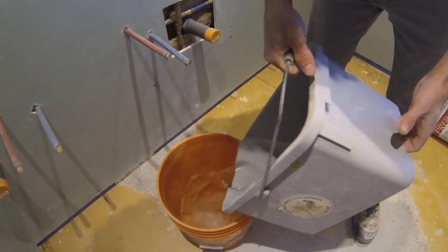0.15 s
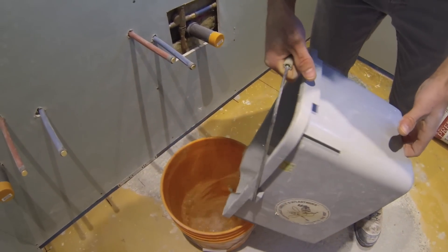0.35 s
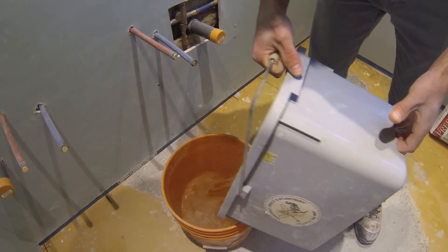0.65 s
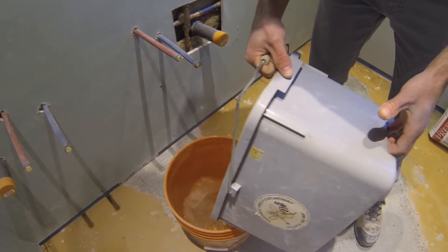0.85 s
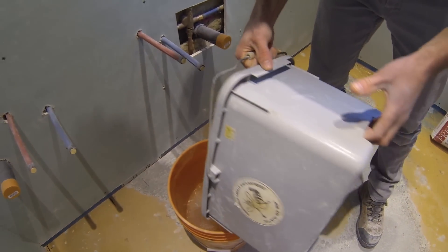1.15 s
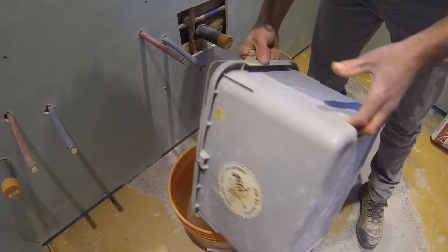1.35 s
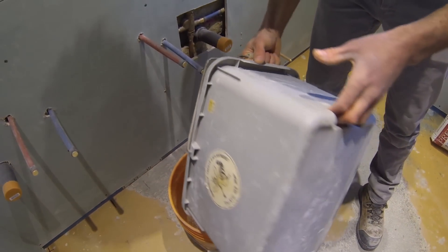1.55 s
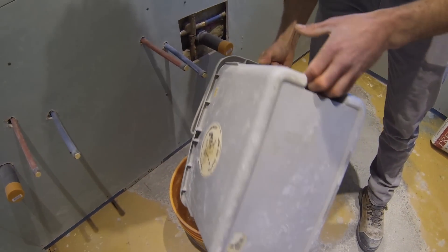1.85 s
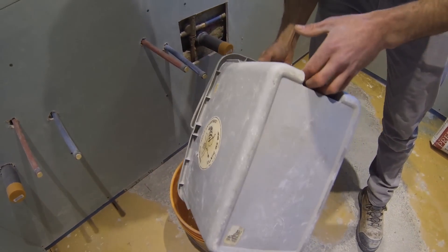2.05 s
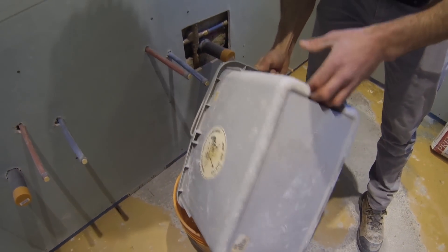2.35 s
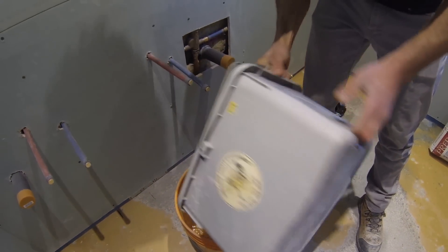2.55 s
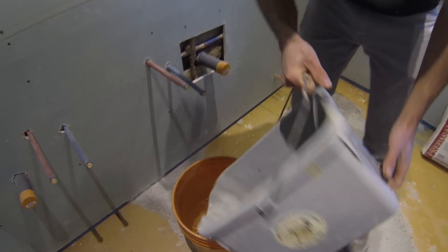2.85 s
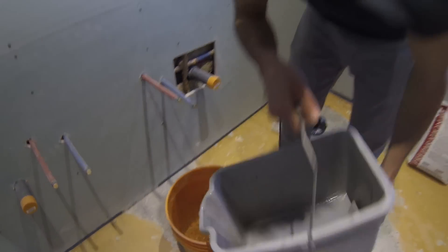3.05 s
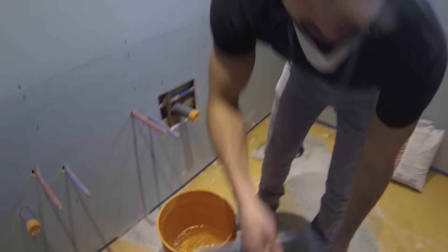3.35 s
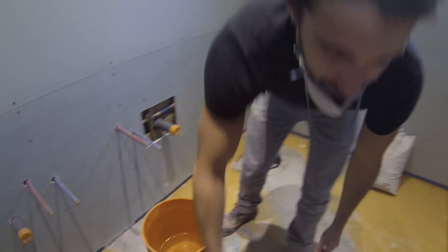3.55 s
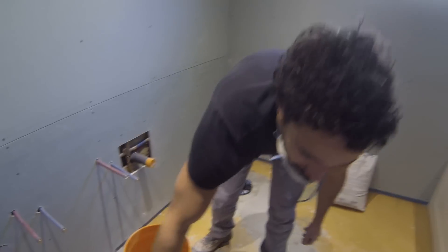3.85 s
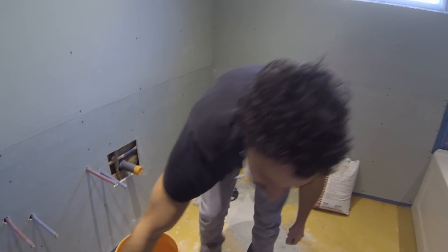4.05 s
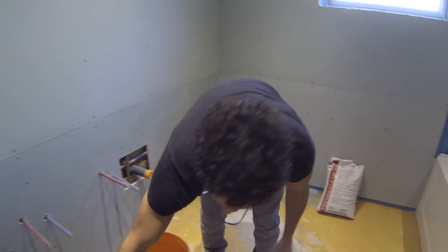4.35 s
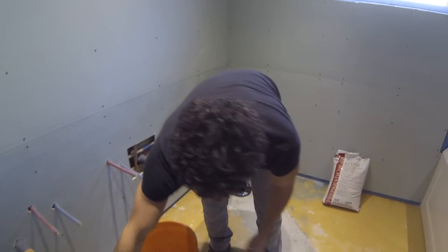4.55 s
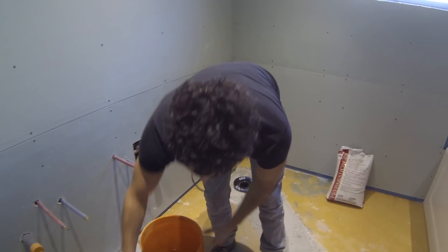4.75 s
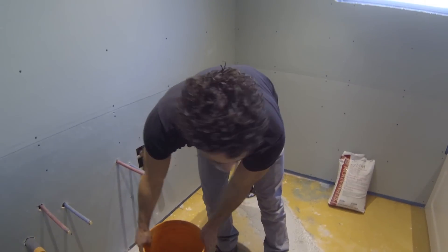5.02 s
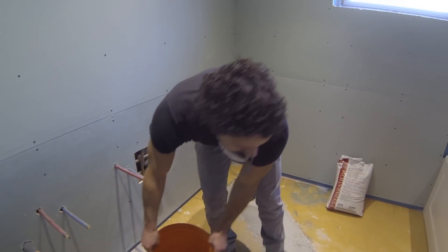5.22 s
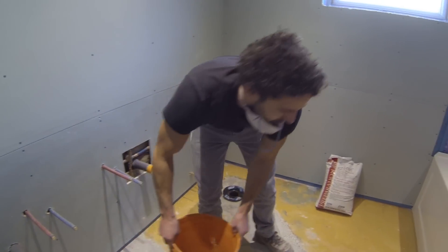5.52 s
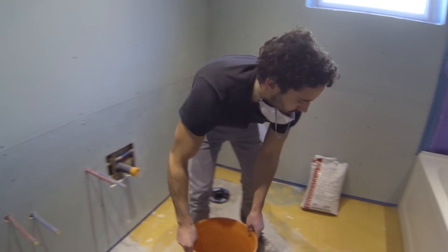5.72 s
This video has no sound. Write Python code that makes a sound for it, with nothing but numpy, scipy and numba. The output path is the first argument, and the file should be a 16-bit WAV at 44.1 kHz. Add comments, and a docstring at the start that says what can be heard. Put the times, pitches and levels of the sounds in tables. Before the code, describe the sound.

A splashing, gurgling pour dwindles to plops and a faint dribble, followed by sharp plastic thumps, a handle clack and gritty scrapes.

```python
"""Water poured between two buckets

Water is tipped from one plastic bucket into another in a small bare room; the stream thins to drips.
The empty bucket lands and rocks, its wire handle hits the rim, and the full one is gripped and dragged.
Water is swarms of ringing bubbles; knocks are noise bursts coloured by the walls plus damped modes.
Close hand-held microphones rumble with movement and clip on the loudest knocks."""
import sys
import numpy as np
from scipy import signal
from scipy.fft import rfft, irfft, next_fast_len
from scipy.io import wavfile
from numba import njit

SR = 44100
rng = np.random.default_rng(int(sys.argv[2]) if len(sys.argv) > 2 else 0)


def persist_wave(psi):
    """Save psi, clipped to +-1, as 16-bit WAV."""
    counts = np.round(np.clip(psi, -1, 1) * 32767).astype(np.int16)
    wavfile.write(sys.argv[1], SR, np.atleast_2d(counts).T)


N = 259347
TIME = np.arange(N) / SR  # seconds
TOP_HZ = 15500  # upper limit of the sound

# Balance of a full stream: its splash level, and the other parts relative to the splash
FULL_STREAM_DB, FULL_GURGLE_DB, FULL_PLUNGE_DB, FULL_SPRAY_DB = -22, -2.5, -19, -11
# A thinner stream gurgles less and its single drops thump and spray more: dB per dB of thinning
GURGLE_LOSS, PLUNGE_GAIN, SPRAY_GAIN = 0.076, 0.15, 0.079
# The last dribble off the rim fades steadily until the bucket is swung away; level as the stream ends
DRIBBLE_DB, DRIBBLE_FADE_DB_PER_S, DRIBBLE_END_S, CUT_OFF_DB_PER_S = -43.5, 7, 3.17, 400
# Strength of the stream, waning until it breaks off: start_s, splash_level_db
STREAM_STRENGTH = [(0.0, -19.5), (1.0, -22.5), (1.651, -26), (1.921, -28.5), (2.08, -45)]
# Slugs of water that plunge deep and change the spray:
# centre_s, spread_s (to 1/e), extra_plunge_db, extra_spray_db
GUSHES = [(0.61, 0.047, 6, 4), (0.743, 0.071, 9.5, -0.5), (1.183, 0.12, 14.5, -7), (1.563, 0.057, 9.5, -1),
          (1.89, 0.043, 19, -8)]


def pour():
    """Jet break-up: the stream's strength sets the balance of its parts, and gushes deepen it."""
    s, db = np.transpose(STREAM_STRENGTH)
    after_s = TIME - s[-1]
    stream_db = np.interp(TIME, s, db) - CUT_OFF_DB_PER_S * np.maximum(after_s, 0)
    dribble_db = DRIBBLE_DB - DRIBBLE_FADE_DB_PER_S * after_s
    dribble_db = dribble_db - CUT_OFF_DB_PER_S * np.maximum(TIME - DRIBBLE_END_S, 0)
    splash_db = np.maximum(stream_db, dribble_db)
    thinning_db = np.clip(FULL_STREAM_DB - splash_db, 0, 30)
    gurgle_db = FULL_GURGLE_DB - GURGLE_LOSS * thinning_db
    plunge_db = FULL_PLUNGE_DB + PLUNGE_GAIN * thinning_db
    spray_db = FULL_SPRAY_DB + SPRAY_GAIN * thinning_db
    for centre_s, spread_s, extra_plunge_db, extra_spray_db in GUSHES:
        swell = np.exp(-((TIME - centre_s) / spread_s) ** 2)
        plunge_db = plunge_db + extra_plunge_db * swell
        spray_db = spray_db + extra_spray_db * swell
    return water(splash_db, FULL_STREAM_DB, gurgle_db, plunge_db, spray_db)


def water(splash_db, full_db, gurgle_db, plunge_db, spray_db):
    """Air entrainment: moving water splashes, traps gurgling bubbles, thumps the pool and throws spray."""
    flow = np.clip(undb(0.6 * (splash_db - full_db)), 0.04, 1)
    plunge = swarm(np.sqrt(flow), 80, 500, cycles=8, scatter_db=1.5, rise=0.08, count=6000)
    gurgle = swarm(flow, 470, 1550, cycles=15, scatter_db=3.2, rise=0.08, count=12000)
    splash = swarm(flow, 1496, 5060, cycles=19, scatter_db=3.2, rise=0.04, count=28000)
    crackle = swarm(flow, 1660, 9600, cycles=2.4, scatter_db=2, rise=0, count=24000)
    spray = swarm(flow, 5135, 13590, cycles=58, scatter_db=-0.5, rise=0.014, count=24000)
    mix = undb(-4.5) * (splash + crackle) + undb(gurgle_db) * gurgle
    mix = mix + undb(plunge_db) * plunge + undb(spray_db) * spray
    return undb(splash_db) * mix


# Colour of water landing in the bucket: frequency_hz, gain_db
WATER_COLOUR = [(50, -11), (88, -19.5), (150, -25.5), (245, -4), (330, -9.5), (440, -13), (600, -8),
                (720, -0.5), (1000, 1.5), (1700, -1), (3400, 5), (5400, -0.5), (8000, -8), (15000, -8)]


def swarm(flow, lo_hz, hi_hz, cycles, scatter_db, rise, count):
    """Clustered random process: clumps of like-pitched bubbles at rms 1; thin flow (0-1) is sparse."""
    clumps = np.repeat(rng.random((count // 8, 3)), 8, axis=0)
    when, pitch, chance = clumps.T
    lag, detune, life, size = rng.random((len(clumps), 4)).T
    start = (when * N + 0.012 * SR * lag).astype(np.int64) % N
    hz = lo_hz * (hi_hz / lo_hz) ** pitch
    hz = np.minimum(hz * 2 ** (0.43 * (detune - 0.5)), TOP_HZ)
    size = undb(-scatter_db * np.log(1 - 0.99 * size))
    # A sparse flow keeps fewer clumps but makes each louder
    size = size * (chance < flow[start]) / np.sqrt(flow[start])
    sound = bubbles(start, hz, cycles * (0.5 + life), size, float(rise))
    return unit(colour(sound, WATER_COLOUR))


@njit
def bubbles(start, hz, cycles, size, rise):
    """Bubble resonance: each rings as a decaying sine, its pitch rising as it nears the surface."""
    out = np.zeros(N)
    for k in range(len(start)):
        n, phase = int(cycles[k] * SR / hz[k]) + 2, 0.
        for i in range(min(n, N - start[k])):
            phase += 2 * np.pi * hz[k] * (1 + rise * i / n) / SR
            out[start[k] + i] += size[k] * np.exp(-6 * i / n) * np.sin(phase)
    return out


# Each drop's small bubbles: window of start times, pitch range, mean length in cycles, level over the drop
SPATTER_S, SPATTER_OCTAVES, SPATTER_CYCLES, SPATTER_DB = 0.037, 0.74, 55, 1.5
# Single bubbles, from a deep boom to a high plink: start_s, starting_pitch_hz, level_db, length_s
PLOPS = [(1.141, 92.4, -24.5, 0.23), (1.55, 4530, -29, 0.075), (1.976, 1525, -23, 0.11),
         (1.99, 765, -22, 0.066), (2.257, 861, -44, 0.054), (2.291, 1050, -30, 0.21),
         (2.371, 3400, -39, 0.086), (2.515, 1114, -24, 0.059), (5.08, 759, -21.5, 0.17),
         (5.325, 652, -30, 0.22)]
# Slaps and drops hitting the pool: start_s, level_db, centre_hz, decay_s
SPLATS = [(.908, -20.5, 1830, 0.018), (1.532, -25.5, 4600, 0.022), (1.644, -29, 3100, 0.049),
          (1.669, -18, 5100, 0.0028), (1.877, -25.5, 1870, 0.02), (1.976, -24.5, 2200, 0.0067),
          (2.255, -32, 760, 0.0045), (2.274, -43.5, 8900, 0.014), (2.37, -34, 2740, 0.0041),
          (2.465, -39, 5100, 0.0095), (2.616, -42, 4070, 0.021), (2.776, -43.5, 4770, 0.0071),
          (3.153, -44, 3100, 0.0035)]


def drips():
    """Impact and entrainment: single bubbles ring, and drops slap the pool and leave small bubbles."""
    s, hz, db, length_s = np.transpose(PLOPS)
    out = bubbles((s * SR).astype(np.int64), hz, hz * length_s, undb(db), 0.04)
    for s, db, hz, decay_s in SPLATS:
        hump = [(hz / 8, -28), (hz / 2, -9), (hz, 0), (hz * 2, -15), (hz * 8, -36)]
        add(out, s, undb(db) * contact(decay_s, hump))
        lag, pitch, life, size = rng.random(size=(4, 5))
        start = ((s + SPATTER_S * lag) * SR).astype(np.int64)
        spatter_hz = hz * 2 ** (SPATTER_OCTAVES * (pitch - 0.5))
        cycles = SPATTER_CYCLES * (0.5 + life)
        out += bubbles(start, spatter_hz, cycles, undb(db + SPATTER_DB) * size, 0.065)
    return out


SLOSH_RISE_DB_PER_S, SLOSH_FADE_DB_PER_S = 134, 60.5
FULL_SLOSH_DB = -40  # level at which swaying water breaks into a continuous wash
# Shoves that set the water swaying in the full bucket: crest_s, level_db
SHOVES = [(4.73, -39), (4.898, -39.5), (5.09, -52.5), (5.419, -60.5)]


def slosh():
    """Sloshing: each shove heaps the water up and lets it settle, with much gurgle and little spray."""
    waves = []
    for crest_s, db in SHOVES:
        rise_db = SLOSH_RISE_DB_PER_S * (crest_s - TIME)
        fade_db = SLOSH_FADE_DB_PER_S * (TIME - crest_s)
        waves.append(db - np.maximum(rise_db, fade_db))
    return water(np.max(waves, axis=0), FULL_SLOSH_DB, gurgle_db=12, plunge_db=10, spray_db=-22.5)


# The empty bucket lands and rocks on the floor:
# start_s, level_db, decay_s, brightness_db_per_octave, ring_db (relative to the clatter)
LANDINGS = [(4.2595, -0.5, 0.006, -1.5, -6.5), (4.275, -10, 0.021, -1.5, 5), (4.3515, 4, 0.0044, -2, -22.5),
            (4.383, -19, 0.088, -5, 9), (4.428, -28, 0.02, -7.5, 23.5), (4.638, -1.5, 0.005, 0, -19.5),
            (4.701, -28, 0.0087, 0.5, 11)]
# The emptied bucket bumps in the hand: start_s, level_db, decay_s, brightness_db_per_octave
BUMPS = [(2.785, -44.5, 0.0075, -11.5), (2.846, -36.5, 0.01, -4.5), (2.953, -36.5, 0.0069, 5),
         (3.0745, -37.5, 0.005, -4.5), (3.251, -33.5, 0.0066, -14), (3.309, -24, 0.0028, -5.5)]
# The full bucket is touched, gripped and dragged: start_s, level_db, decay_s, brightness_db_per_octave
GRIPS = [(4.05, -35.5, 0.015, 2.5), (4.074, -24, 0.011, -2.5), (4.828, -12.5, 0.0079, 1.5),
         (4.841, -8, 0.0087, -2.5), (4.965, -26, .02, -10), (5.014, -18, 0.0077, -4),
         (5.058, -17, 0.0062, -0.5), (5.301, -26.5, 0.021, -3.5), (5.356, -19, 0.0088, 3.5),
         (5.370, -15, 0.012, 3)]
# Low modes of the empty bucket on the floor: frequency_hz, level_db, t60_s
STANDING_MODES = [(110, -28, .4), (165, -19, .45), (237, -14, .4), (278, 0, .39), (329, -12, .3),
                  (452, -4, .28), (495, -13, .28), (775, -16, .35), (872, -11, .35), (938, -10, .3),
                  (1040, -12, .3)]
# Low modes of the empty bucket hanging in the hand: frequency_hz, level_db, t60_s
HANGING_MODES = [(308, -5.5, 0.22), (422, -12, 0.28), (755, -4.5, 0.12), (861, -7.5, .16), (936, -6, 0.1)]
# Modes of the air above the water in the full bucket: frequency_hz, level_db, t60_s
CAVITY_MODES = [(172, -7, .18), (243, -6, .3), (430, -6, .12), (667, -3, .12), (712, -3, .12),
                (761, -1, .15), (835, -6, .1)]
# Ring of a hand-held bucket relative to its clatter; extra dB per dB/octave of dullness
EMPTY_RING_DB, FULL_RING_DB, DULL_RING_GAIN = -0.5, -14.5, 1.3


def knocks():
    """Impact excitation: bumps, landings and grips each drive the modes of their own bucket."""
    bumps = blows(held(BUMPS, EMPTY_RING_DB), HANGING_MODES)
    landings = blows(LANDINGS, STANDING_MODES)
    grips = blows(held(GRIPS, FULL_RING_DB), CAVITY_MODES)
    return np.sum([bumps, landings, grips], axis=0)


def held(table, ring_db):
    """Contact stiffness: the duller a blow in the hands, the more of it goes into the low ring."""
    return [(s, db, decay_s, bright_db, ring_db - DULL_RING_GAIN * bright_db)
            for s, db, decay_s, bright_db in table]


# Dense, quickly damped resonances of the plastic walls: frequency_hz, gain_db
SHELL_COLOUR = [(50, -24.5), (110, -7.5), (170, 3.5), (205, -6.5), (350, -4), (460, 4.5), (650, -3),
                (950, 2.5), (1700, 0), (2200, -4), (3600, -7.5), (4800, -16), (7500, -30), (15000, -44.5)]


def blows(table, modes):
    """Modal excitation: every blow gives a clatter of the walls and a low ring of the whole bucket."""
    clatter, boom = np.zeros(N), np.zeros(N)
    for s, db, decay_s, bright_db, ring_db in table:
        add(clatter, s, undb(db) * contact(decay_s, SHELL_COLOUR, bright_db))
        add(boom, s, undb(db + ring_db) * ring(modes, bright_db))
    return clatter, boom


def ring(modes, tilt_db=0):
    """Modal decay: a soft blow favours the low modes, and all waver as the thin walls flex."""
    t, out = TIME[:SR], 0
    for hz, db, t60 in modes:
        flex = np.interp(t, np.linspace(0, 1, 60), rng.standard_normal(60))
        phase = 2 * np.pi * hz * (t + 0.0083 * np.cumsum(flex) / SR)
        softness_db = tilt_db * np.log2(hz / 280)
        level_db = db + softness_db - 60 * t / t60 + 2 * flex
        out = out + undb(level_db) * np.sin(phase)
    return out


def contact(decay_s, spectrum, tilt_db=0):
    """Contact noise: a coloured burst whose energy grows with its length."""
    sound = colour(burst(decay_s), spectrum, tilt_db)
    return sound * np.sqrt(abs(decay_s) * SR / np.sum(sound ** 2))


def burst(decay_s, grain=0.52):
    """Stick-slip contact: noise of tiny slips and strikes builds up quickly and dies away."""
    t = TIME[:SR // 4] / max(decay_s, 3e-4)
    lumps = np.repeat(rng.standard_normal(len(t)), 16)[:len(t)]
    envelope = 2 * (np.exp(-t) - np.exp(-4 * t))
    return rng.standard_normal(len(t)) * np.exp(grain * lumps) * envelope


# The wire handle strikes the rim: start_s, level_db
CLACKS = [(4.642, -8.5), (4.6531, 0.5)]
# Colour of the handle's clack: frequency_hz, gain_db
HANDLE_COLOUR = [(200, -19), (1200, 4), (1600, -26.5), (2400, -4.5), (3200, 11.5), (3800, 16), (4600, 1.5),
                 (5600, -1), (7200, -7), (15000, -40)]


def handle():
    """Hard impact: the wire handle falls against the rim in short, bright clacks."""
    out = np.zeros(N)
    for s, db in CLACKS:
        add(out, s, undb(db) * contact(0.0021, HANDLE_COLOUR))
    return out


# Grit scraping under a bucket: start_s, length_s, level_db
SCRAPES = [(4.776, 0.16, -33), (4.981, 0.11, -33.5), (5.194, 0.1, -40), (5.29, 0.043, -37.5),
           (5.438, 0.016, -31.5), (5.514, 0.0079, -38)]


def grit():
    """Granular friction: dust and sand crunch under the bucket's base as spiky, swelling noise."""
    out = np.zeros(N)
    for s, length_s, db in SCRAPES:
        n = int(length_s * SR)
        grains = rng.standard_normal(SR // 2)[:n] ** 3  # cubing makes the noise spiky
        crunch = unit(colour(grains, [(500, 6), (3000, 13), (7000, 1.0), (15000, -8.5)]))
        add(out, s, undb(db) * crunch * np.sin(np.linspace(0, np.pi, n)))
    return out


# The room's decay: band_centre_hz, t60_s
ROOM_DECAY = [(100, 0.51), (400, 0.51), (1000, 0.35), (3500, 0.28), (7000, 0.32), (15000, 0.35)]


def room(x, wet_db):
    """Reverberation: direct sound plus a dense tail from close bare walls, lasting longest in the bass."""
    t = TIME[:int(0.8 * SR)]
    hz = np.arange(len(t) // 2 + 1) * SR / len(t)
    noise = rfft(rng.standard_normal(len(t)))
    centres = np.array(ROOM_DECAY)[:, 0]
    tail = 0
    for centre_hz, t60 in ROOM_DECAY:
        band = lookup(np.c_[centres, centres == centre_hz], hz)  # overlapping triangles
        tail = tail + irfft(noise * band, len(t)) * undb(-60 * t / t60)
    tail = tail * np.clip((t - 0.002) / 0.0028, 0, 1)
    wet = undb(wet_db)
    response = wet * tail / np.sqrt(0.035 * SR)
    response[0] += 1
    return signal.fftconvolve(x, response)[:N] / np.sqrt(1 + wet ** 2)


# Steady room air: frequency_hz, gain_db
AIR_COLOUR = [(30, -3.5), (95, -6), (140, -12), (300, -15), (600, -18.5), (1500, -27), (5000, -32.5),
              (15000, -42)]
# Handling rumble, calmer late in the pour and stronger with movement: time_s, level_db
SHAKE = [(0, -24), (1.5, -35), (2.3, -35), (3.5, -19), (4.6, -23), (5.88, -28)]
# Spectrum of the handling rumble: frequency_hz, gain_db
RUMBLE_COLOUR = [(4, -22), (8, -6), (11.5, 0), (16, -5), (21, -9), (30, -14), (40, -25), (52, -44),
                 (70, -58), (200, -90)]


def background(air_db, shake_db):
    """Shaped noise: faint room air and the deep rumble of hand-held microphones."""
    rumble = unit(colour(rng.standard_normal(N), RUMBLE_COLOUR))
    shake = undb(np.interp(TIME, *np.transpose(SHAKE)) + shake_db) * rumble
    air = unit(colour(rng.standard_normal(N), AIR_COLOUR))
    return shake + undb(air_db) * air


def undb(db):
    """Logarithmic level: decibels to gain."""
    return 10 ** (np.asarray(db) / 20)


def unit(x):
    """Normalisation: scale to rms 1."""
    return x / np.sqrt(np.mean(x ** 2) + 1e-18)


def add(track, s, sound):
    """Superposition: mix a sound into a track at time s."""
    i = max(int(s * SR), 0)
    track[i:i + len(sound)] += sound[:max(N - i, 0)]


def lookup(table, hz):
    """Interpolation: read (Hz, value) points on a log-frequency axis."""
    f, value = np.transpose(table)
    return np.interp(np.log(hz + 0.0014), np.log(f), value)


def colour(x, table, tilt_db=0):
    """Minimum-phase filter: causal, through (Hz, dB) points, tilted per octave about 1 kHz."""
    n = next_fast_len(len(x) + 2048, True)
    hz = np.arange(n // 2 + 1) * SR / n
    octaves = np.log2(np.maximum(hz, 250) / 1000)  # the tilt levels off below 250 Hz
    cepstrum = irfft(np.log(undb(lookup(table, hz) + tilt_db * octaves)), n)
    # Folding the cepstrum forward in time makes the filter causal
    cepstrum[1:n // 2] *= 2
    cepstrum[n // 2 + 1:] = 0
    return irfft(rfft(x, n) * np.exp(rfft(cepstrum)), n)[:len(x)]


# Room sound relative to direct sound; the low ring is heard mostly direct, with little room
WATER_WET_DB, CLATTER_WET_DB, HANDLE_WET_DB, RING_WET_DB = -3.5, -0.5, -6.5, -12
RADIATION_HZ = 85  # the buckets are too small to radiate deeper bass
AIR_DB = -46.5
# Parts that differ between the microphones, relative to the shared air and rumble
UNSHARED_AIR_DB, UNSHARED_SHAKE_DB = -20, -16


def scene():
    """Mid-side sum: sources reach both microphones alike; only a little air noise and rumble differ."""
    clatter, boom = knocks()
    liquid = room(pour() + slosh() + drips(), WATER_WET_DB)
    buckets = room(clatter + grit(), CLATTER_WET_DB)
    buckets = buckets + room(handle(), HANDLE_WET_DB) + room(boom, RING_WET_DB)
    radiation = signal.butter(2, RADIATION_HZ, "high", fs=SR, output="sos")
    buckets = signal.sosfilt(radiation, buckets)
    mid = liquid + buckets + background(AIR_DB, shake_db=0)
    side = background(AIR_DB + UNSHARED_AIR_DB, UNSHARED_SHAKE_DB)
    return np.array([mid + side, mid - side])


# Overload amplitude of each microphone: left, right [full scale = 1]
CLIP_LEVELS = (1.0, .9)


def record(dry):
    """Overload and band limit: the loudest knocks clip, sooner at one microphone; the top is cut."""
    limit = np.array(CLIP_LEVELS)[:, None]
    clipped = np.clip(dry, -limit, limit)
    return signal.sosfilt(signal.ellip(8, 0.2, 70, TOP_HZ, fs=SR, output="sos"), clipped)


dry = scene()
out = record(dry)
persist_wave(out)
```